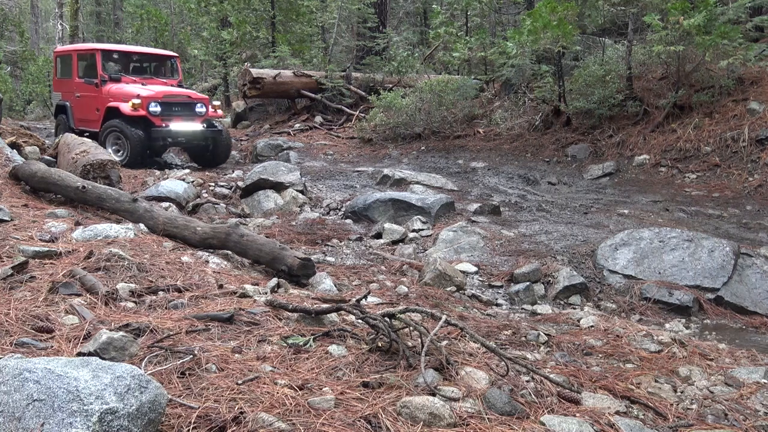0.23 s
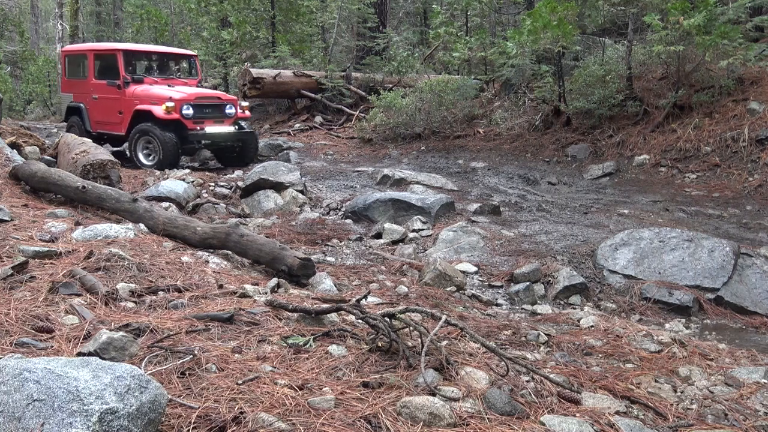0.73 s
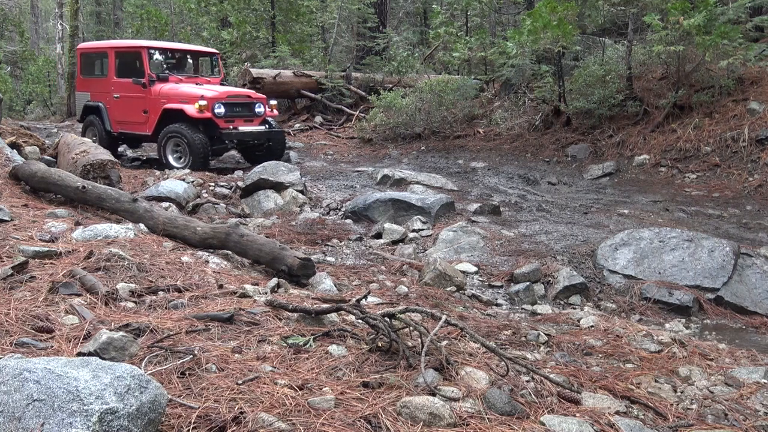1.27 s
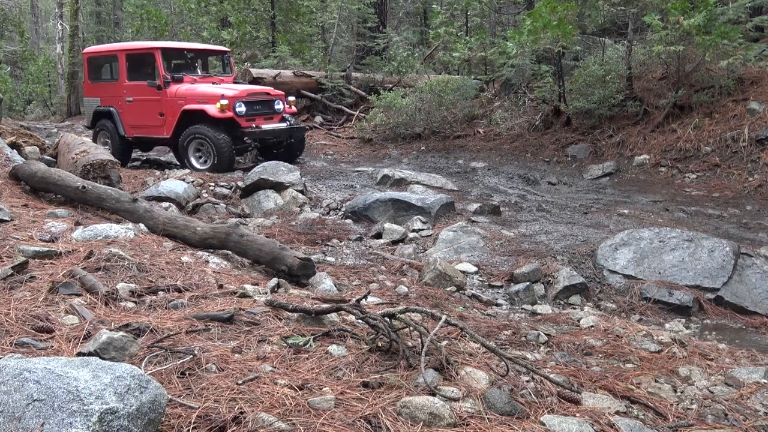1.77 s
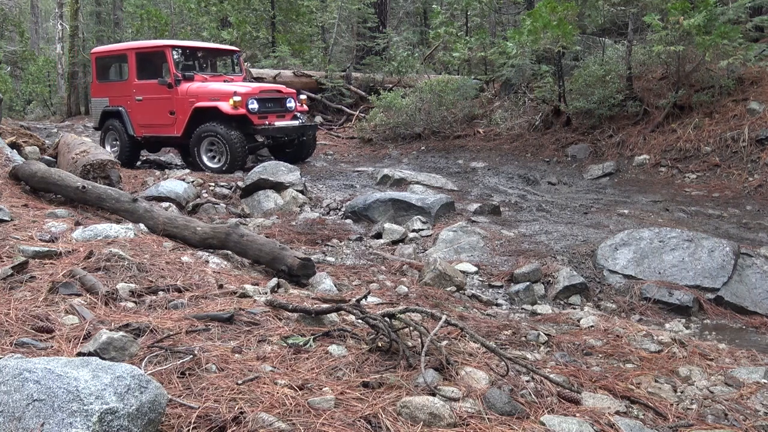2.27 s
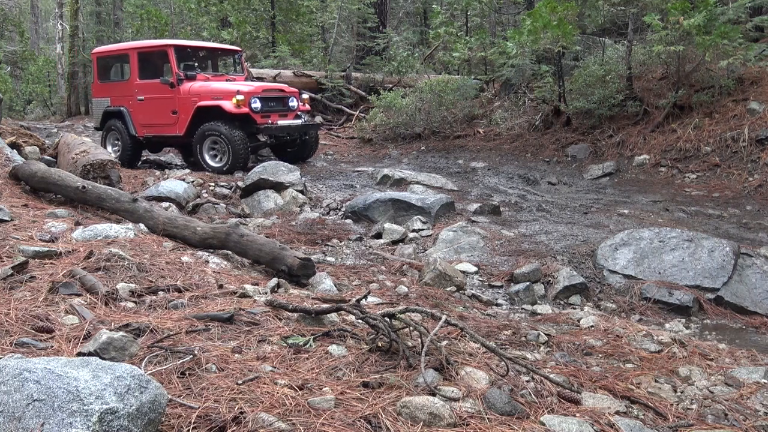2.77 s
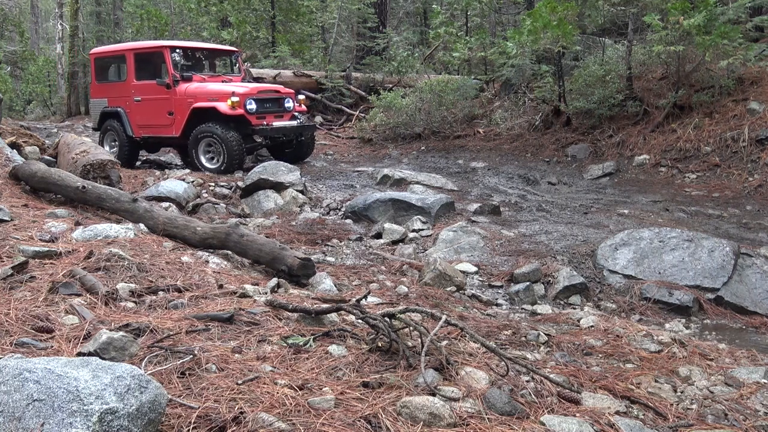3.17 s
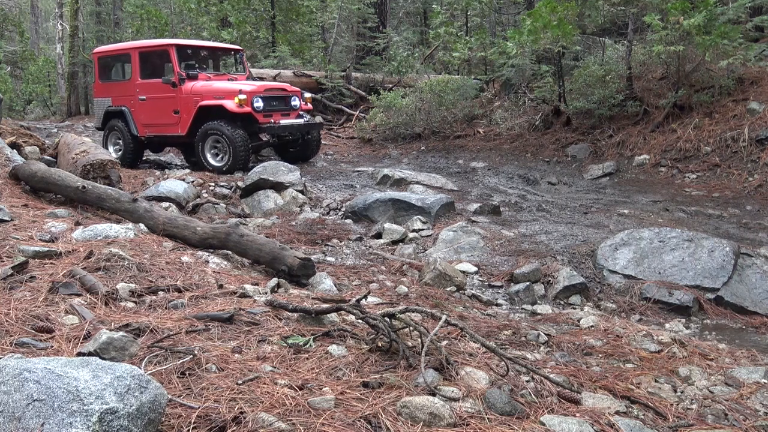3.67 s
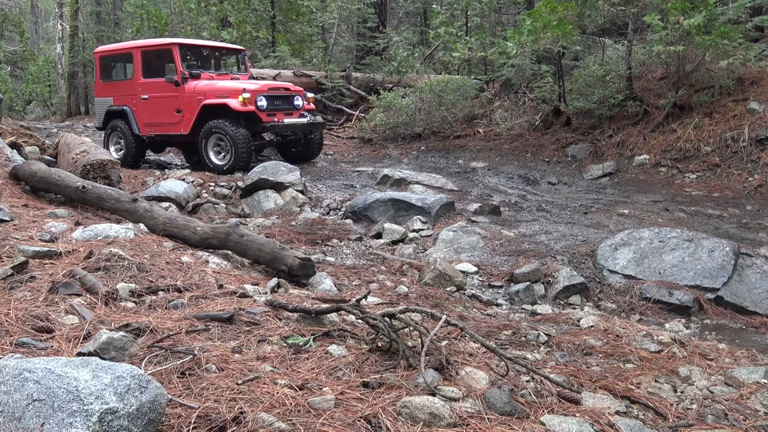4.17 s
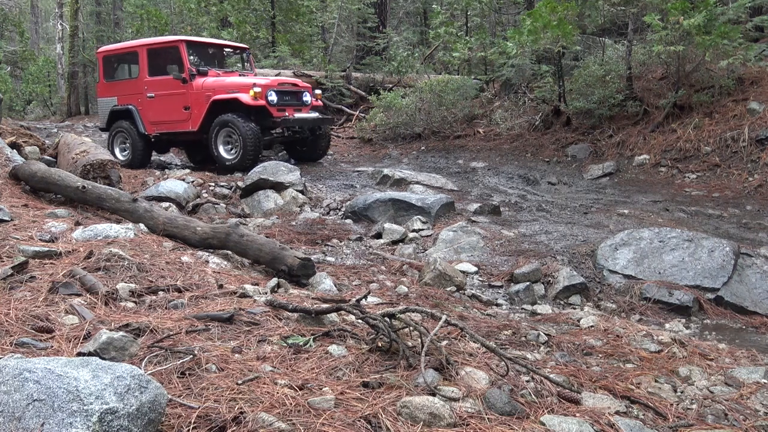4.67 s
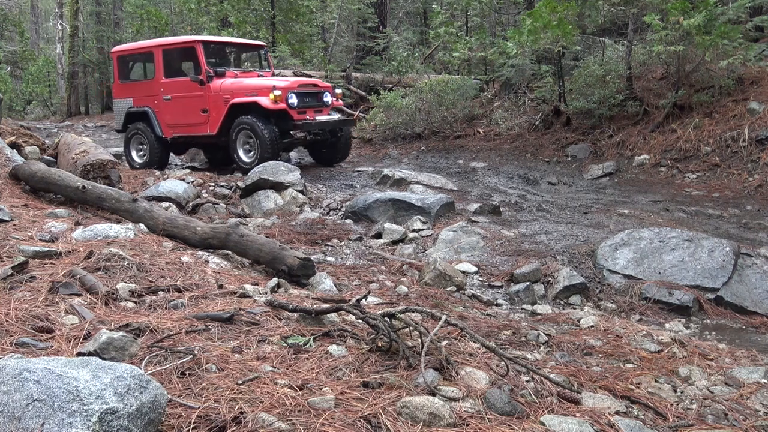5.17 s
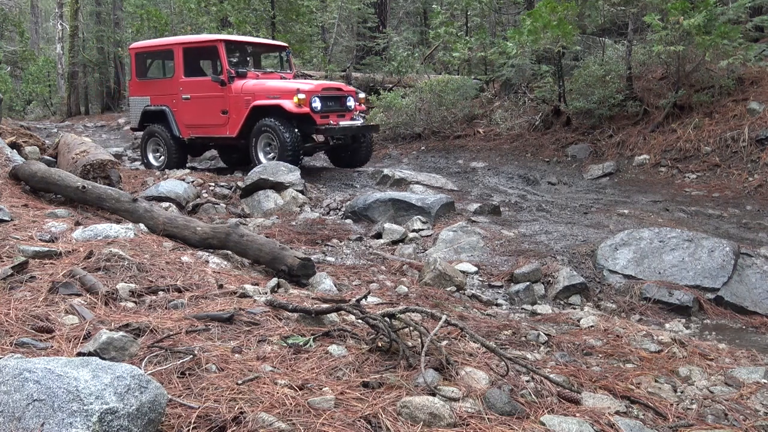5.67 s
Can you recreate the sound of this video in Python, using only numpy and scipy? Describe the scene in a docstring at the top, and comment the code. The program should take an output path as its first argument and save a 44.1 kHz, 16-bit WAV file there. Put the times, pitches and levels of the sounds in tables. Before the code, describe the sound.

Low uneven engine burble and whining fan, two throaty revs with crackling exhaust, tyre grit scraping on stones, then the engine sinks to a slow chug.

```python
"""A wet forest trail: some metres from the microphone, a V8 four-wheel-drive truck crawls over rocks.
Uneven firing pulses through a pipe make it lope near idle, while fan harmonics whine over coloured air noise.
It surges twice, the exhaust spitting bright noise bursts, and a tyre spins on the stones as scraping grit;
then the engine lugs down again. Bursts of band-passed grains knock, crunch, groan and squeak under the tyres.
The trees return a dull, scattered echo."""
import sys
import numpy as np
from scipy import signal
from scipy.fft import rfft, irfft, next_fast_len
from scipy.io import wavfile
from scipy.ndimage import uniform_filter1d

SR = 44100
rng = np.random.default_rng(int(sys.argv[2]) if len(sys.argv) > 2 else 0)


def file_out(sig):
    """Save sig as 16-bit WAV at sys.argv[1]."""
    # one column per channel
    cols = np.atleast_2d(sig).T
    # limit, then scale
    lim = np.clip(cols, -1, 1)
    pcm = np.round(lim * 32767).astype(np.int16)
    wavfile.write(sys.argv[1], SR, pcm)


N = 260631
TIME = np.arange(N) / SR   # s

# engine speed: (time [s], firing rate [firings/s])
ENGINE_SPEED = [(0, 76), (.3, 73), (.8, 56), (2.9, 51), (3.08, 66.6), (3.26, 92.6), (3.52, 56.3),
                (3.78, 54.8), (3.92, 91.5), (4.08, 110), (4.2, 123), (4.33, 121.5), (4.5, 115), (4.7, 97.6),
                (4.9, 90.7), (5.2, 62), (5.73, 36), (5.91, 48.5)]
# the eight cylinders in firing order: (strength [dB], lateness at the tailpipe [ms])
CYLINDERS = [(0, 2), (1.5, -0.92), (-1, 0.78), (3.5, -3), (-1.5, -0.07), (1, 2), (1.5, -2.5), (-2.5, 3.5)]
# response of pipe and muffler: (frequency [Hz], relative level [dB])
PIPE_RESPONSE = [(18, -44.5), (35, -16.5), (52, -7), (75, -5), (102, 3.5), (130, -1), (170, -11.5),
                 (228, -7.5), (265, -11.5), (325, -5), (430, -8), (520, -21.5), (800, -45.5), (6000, -80)]
# colour of the exhaust's spit and sizzle: (frequency [Hz], relative level [dB per Hz])
SPIT_COLOUR = [(2000, -38), (4000, -12), (6000, -14), (7300, -7), (8500, -4.5), (10000, -18.5),
               (13000, -18.5), (15500, -31)]


def from_db(db):
    """Decibels to amplitude."""
    return 10 ** (np.asarray(db) / 20)


def rms_one(x):
    """Scales a signal to an RMS of 1."""
    return x / np.sqrt(np.mean(x ** 2) + 1e-20)


def in_time(rows):
    """Each column of a curve at every sample."""
    seconds, *columns = np.transpose(rows)
    return [np.interp(TIME, seconds, column) for column in columns]


def levelled(x, seconds):
    """Takes out the slow level and keeps the beat."""
    power = uniform_filter1d(x ** 2, max(int(seconds * SR), 8))
    return x / np.sqrt(np.abs(power) + 1e-12)


def drift(rate):
    """Slow random wander of RMS 1, with `rate` knots per second."""
    knots = rng.standard_normal(2048)
    return rms_one(np.interp(TIME * rate, np.arange(len(knots)), knots))


def coloured(x, spectrum):
    """Causal (minimum-phase) filter with the given (frequency [Hz], level [dB]) response."""
    size = 2 * next_fast_len(N // 2 + 8192)
    hz, db = np.transpose(spectrum)
    bins_hz = np.maximum(np.arange(size // 2 + 1) * SR / size, 1)
    response_db = np.interp(np.log(bins_hz), np.log(hz), db)
    # folding the cepstrum onto positive times gives the minimum phase
    cepstrum = irfft(np.log(from_db(response_db)))
    cepstrum[1:size // 2] *= 2
    cepstrum[size // 2 + 1:] = 0
    return irfft(rfft(x, size) * np.exp(rfft(cepstrum)))[:N]


def passed(x, hz, kind, order=2):
    """Butterworth filter."""
    edges_hz = np.clip(hz, 10, .45 * SR)
    return signal.sosfilt(signal.butter(order, edges_hz, kind, fs=SR, output="sos"), x)


def decaying(pulses, decay_s):
    """Gives every pulse an exponential tail."""
    return signal.lfilter([1], [1, -np.exp(-1 / (decay_s * SR))], pulses)


def burst(start, rise, decay):
    """A quick linear rise and an exponential fall."""
    age = np.maximum(TIME - start, 0)
    fall = np.minimum(np.maximum(age - rise, 0) / decay, 20)
    return np.minimum(age / rise, 1) * np.exp(-fall)


def held(start, length, attack, release):
    """A linear rise, a hold until start + length, then an exponential fall."""
    rise = np.clip((TIME - start) / attack, 0, 1)
    return rise * np.exp(-np.maximum(TIME - start - length, 0) / release)


def grit(per_s, spread_db):
    """Dense tiny fractures of very unequal size."""
    sizes_db = spread_db * np.minimum(rng.exponential(1, N), 4)
    sizes = from_db(sizes_db) * rng.standard_normal(N)
    return rms_one(sizes * (rng.random(N) < per_s / SR))


def forest(x):
    """Dull scattered echoes from trunks and the bank, arriving at random and dying exponentially."""
    t60_s, first_echo_s = .45, .015
    age = TIME[:SR // 2]
    hits = (rng.random(len(age)) < .01) * (age > first_echo_s)
    echoes = rng.standard_normal(len(age)) * hits * from_db(-60 * age / t60_s)
    echoed = signal.fftconvolve(x, echoes / np.linalg.norm(echoes))[:N]
    return passed(echoed, 3700, "low")


def engine_bay(clatter, flutter_db):
    """Noise of air through the fan and radiator, throbbing faintly with the valve gear at the firing rate."""
    # fan, belts and valve gear: (time [s], level [dB])
    bay_level = [(0, -31.5), (1.0, -28.5), (1.4, -30.5), (1.8, -29), (2.4, -30.5), (5.91, -31)]
    # colour of the bay: (frequency [Hz], relative level [dB per Hz])
    bay_colour = [(150, -8), (320, 0.5), (540, -13), (800, -6), (1100, -6.5), (1750, -9), (2700, -15),
                  (4100, -17), (6000, -23.5), (8400, -22), (10000, -37), (13300, -36.5), (15000, -45)]
    fired = np.cumsum(in_time(ENGINE_SPEED)[0]) / SR
    throb = (1 + clatter * np.cos(2 * np.pi * fired)) * from_db(flutter_db * drift(25))
    air = rms_one(coloured(throb * rng.standard_normal(N), bay_colour))
    return from_db(in_time(bay_level)[0]) * air


def fan(wobble, flutter_db):
    """Harmonics of the blade rate, each fluttering on its own; some swell and fade."""
    # blade rate before wobble: (time [s], rate [Hz])
    blade_rate = [(0, 373.8), (1.2, 373.4), (2.3, 371.7), (3.6, 375.1), (5.1, 367), (5.91, 369.5)]
    # the whine before swells and flutter: (harmonic number, level [dB])
    harmonics = [(2, -48), (3, -46.5), (5, -50.5), (6, -44), (7, -47.5), (8, -52.5), (9, -54.5),
                 (10, -52.5), (11, -50.5), (12, -62)]
    # single harmonics swell as the truck turns: (harmonic number, middle [s], half length [s], rise [dB])
    whine_swells = [(2, 1.43, 0.49, 7), (5, 0.89, 0.29, 9.5), (5, 2.6, 1.7, 11), (5, 5.57, 0.7, 12.5),
                    (6, 0.95, 0.91, 11), (7, 1.18, 0.24, 7.5), (7, 1.888, 0.28, 6), (7, 2.9, 1.14, 6.5)]
    flatness = 4   # 2 is a bell, higher is flatter on top
    rate = in_time(blade_rate)[0] * (1 + wobble * drift(30.09))
    phase = 2 * np.pi * np.cumsum(rate) / SR
    whine = np.zeros(N)
    for order, db in harmonics:
        swell_db = np.zeros(N)
        for swelling, middle, half, rise_db in whine_swells:
            if swelling == order:
                swell_db += rise_db * np.exp(-np.abs((TIME - middle) / half) ** flatness)
        whine += from_db(db + swell_db + flutter_db * drift(14)) * np.sin(order * phase)
    return np.sqrt(2) * whine   # a sine of RMS 1 stands at 0 dB


def under_tyres(rise_s):
    """Sounds under the tyres: low knocks and thumps, bright crunches, a rubber groan and short squeaks."""
    # bursts under the tyres: (time [s], level [dB], centre [Hz], width [octaves], decay [s])
    tyre_sounds = [(0.179, -30.5, 7560, 0.47, 0.017), (.42, -33.5, 2000, 1, 0.14),
                   (.678, -31, 910, .9, 0.019), (.865, -25.5, 1390, 2.1, 0.076),
                   (0.882, -32, 4970, 1.4, 0.024), (1.365, -28, 517, 1.02, 0.024),
                   (1.455, -14.5, 89, 0.89, 0.0092), (2.075, -33, 2180, 1.13, 0.023),
                   (3.944, -25, 5150, 0.15, 0.0074), (4.585, -17.5, 930, 0.38, 0.045),
                   (4.6, -20.5, 1520, 0.44, 0.14), (4.68, -24, 2290, 1.7, 0.06),
                   (4.87, -25.5, 2000, 3.08, 0.029), (4.94, -32, 5600, 0.1, 0.015),
                   (5.35, -31, 1990, 1.08, 0.049), (5.384, -26.5, 1640, 0.8, 0.11),
                   (5.495, -31, 2386, 2, 0.058), (5.865, -31.5, 1502, 0.72, 0.037)]
    out = np.zeros(N)
    grains = grit(per_s=7600, spread_db=5.0)
    for start, db, hz, octaves, decay in tyre_sounds:
        half = 2 ** max(octaves / 2, .05)   # frequency ratio from centre to edge
        band = rms_one(passed(grains, [hz / half, hz * half], "band"))
        out += from_db(db) * burst(start, rise_s, decay) * band
    return out


def tyre_spin(judder_db):
    """A tyre breaks loose: tread blocks grab and scrape over wet grit, easing off until the tyre grips."""
    # colour of the scrape: (frequency [Hz], relative level [dB per Hz])
    scrape_colour = [(240, -7), (400, -12), (502, -6), (804, 2), (1090, -2.5), (1740, -3), (2790, -13.5),
                     (6040, -26), (8060, -29), (15000, -52)]
    start_s, start_db, sag_db_per_s = 4.5, -15, 20.5
    scrape = grit(per_s=14000, spread_db=2.0) * from_db(judder_db * drift(90))
    slip = held(start_s, length=0.43, attack=0.12, release=0.067)
    level_db = start_db - sag_db_per_s * np.maximum(TIME - start_s, 0)
    return from_db(level_db) * slip * rms_one(coloured(scrape, scrape_colour))


def load():
    """Strength of the firings in dB above idle; the strongest push on the pedal rules."""
    # pushes on the accelerator: (start [s], length [s], load above idle [dB])
    throttle = [(-0.2, 0.81, 6), (2.864, 0.2, 10), (3.007, 0.26, 17), (3.284, 0.13, 13.5), (3.5, 0.25, 8),
                (3.716, 1.057, 17.5), (4.883, 0.31, 9.5), (5.33, 0.35, 5), (5.83, 0.1, 8)]
    pushes = [db * held(start, length, attack=0.097, release=0.18) for start, length, db in throttle]
    return np.max(pushes, axis=0)


def exhaust_levels(speed):
    """Load drives the boom; with rising speed the energy moves up into the bark."""
    # exhaust without load: (firing rate [firings/s], boom level [dB], bark level [dB])
    voice = [(36, -28.5, -52.5), (51.4, -26, -35.5), (71.8, -25.5, -36), (90, -27.5, -26),
             (111, -31.5, -21), (120, -32.5, -21)]
    bark_follows_load = 0.37   # dB of bark per dB of load
    at_speed, boom_db, bark_db = np.transpose(voice)
    load_db = load()
    boom = np.interp(speed, at_speed, boom_db) + load_db
    bark = np.interp(speed, at_speed, bark_db) + bark_follows_load * load_db
    return boom, bark


def firings(speed, uneven_db, jitter, lope):
    """One pulse per firing; combustion is less even at low speed."""
    count = np.cumsum(speed) / SR
    number = np.arange(1, int(count[-1]))
    chance = rng.standard_normal((len(number), 2))
    at = np.interp(number, count, TIME)
    rate = np.interp(at, TIME, speed)
    level_db, late_ms = np.array(CYLINDERS)[number % len(CYLINDERS)].T
    unsteady = (speed.max() / rate) ** lope
    # jitter is a share of the firing interval
    at = at + late_ms / 1000 + jitter * unsteady * chance[:, 0] / rate
    pulses = np.zeros(N)
    places = np.clip(at * SR, 0, N - 1).astype(int)
    pulses[places] = from_db(level_db + uneven_db * unsteady * chance[:, 1])
    return pulses


def drone(speed, revving):
    """The part of the exhaust note that repeats exactly from cycle to cycle, coloured by the pipe."""
    # clean tones before the pipe: (multiple of the eight-firing cycle, lugging [dB], revving [dB]), relative
    tones = [(3, 3, -5), (5, 4.5, 11.5), (7, -4, -3), (8, 5, -3.5), (9, -30, 0), (10, -14.5, 1.5),
             (11, 0, -13), (12, -4, 0), (13, -7, 4.5), (15, -14, -4), (16, -4.5, 3), (20, -15, -0.5),
             (22, -15, -4.5), (24, -5.5, 2), (27, -18, 0)]
    cycles = np.cumsum(speed) / SR / len(CYLINDERS)
    pipe_hz, pipe_db = np.transpose(PIPE_RESPONSE)
    out = np.zeros(N)
    for order, lugging_db, revving_db in tones:
        tone_db = lugging_db + revving * (revving_db - lugging_db)
        tone_db = tone_db + np.interp(order * speed / len(CYLINDERS), pipe_hz, pipe_db)
        out += from_db(tone_db) * np.sin(2 * np.pi * (order * cycles + rng.random()))
    return levelled(out, 0.13)


def spits(level_db, rise_s, decay_s, small_db, spread_db):
    """Under load some firings end in a short bright spit of noise; a few are much louder."""
    # the loudest spits: (time [s], peak level relative to level_db [dB])
    loud_spits = [(3.16, -12.5), (3.2204, -15), (3.7979, -15), (3.8457, -8.5), (3.8871, -14), (3.911, -13),
                  (3.9463, -10.5), (4.0087, -13), (4.1445, -13), (4.2358, -14.5), (4.354, -20),
                  (4.561, -18)]
    spit_share, follows_load = .4, 1.3   # share of firings that spit; dB of spit per dB of load
    loud = sum(from_db(db + level_db) * burst(start, rise_s, decay_s) for start, db in loud_spits)
    fired = np.diff(np.floor(np.cumsum(in_time(ENGINE_SPEED)[0]) / SR), prepend=0) > 0
    spitting = fired * (rng.random(N) < spit_share)
    load_db = load()
    # small_db holds at the heaviest load
    sizes_db = small_db + follows_load * (load_db - load_db.max()) + spread_db * rng.uniform(-1.3, 1, N)
    small = decaying(spitting * from_db(sizes_db) + 1e-18, decay_s)
    return np.maximum(loud, small) * rms_one(coloured(rng.standard_normal(N), SPIT_COLOUR))


def exhaust(puff_s, rasp_db, sizzle_db, throb, boom_share):
    """Pulses boom and bark through the pipe; every puff also carries rushing gas."""
    # single beats against the clean note: (firing rate [firings/s], relative level [dB])
    beats = [(50, 0), (75, -6), (120, -11)]
    # firing rates between which the note changes from lugging to revving: (lower, upper) [firings/s]
    revving_range = (92, 114)
    # colour of the gas rush: (frequency [Hz], relative level [dB per Hz])
    rasp_colour = [(300, 7), (550, -2), (950, 2.5), (1400, -7.5), (2200, -10.5), (4000, -14), (8000, -18),
                   (15000, -34.5)]
    speed = in_time(ENGINE_SPEED)[0]
    boom_db, bark_db = exhaust_levels(speed)
    revving = np.interp(speed, revving_range, [0, 1])
    pulses = firings(speed, uneven_db=0.1, jitter=0.011, lope=0.69)
    puffs = levelled(decaying(pulses + 1e-9, puff_s), .2)
    flow = levelled(pulses, .3) + .18 * puffs * rng.standard_normal(N)

    # the faster the engine turns, the more the single beats merge into a clean note
    beat_db = np.interp(speed, *np.transpose(beats))
    single_beats = from_db(beat_db) * levelled(coloured(flow, PIPE_RESPONSE), .2)
    pipe = single_beats + drone(speed, revving)

    # when lugging, the bark swells once in every cycle of eight firings
    cycles = np.cumsum(speed) / SR / len(CYLINDERS)
    swell = 1 - throb * (1 - revving) * np.sin(2 * np.pi * cycles)
    boom = from_db(boom_db) * levelled(passed(pipe, 170, "low", order=4), .07)
    bark = from_db(bark_db) * swell * levelled(passed(pipe, 170, "high", order=4), .09)

    # the rush follows a level between bark and boom
    rush_db = rasp_db + bark_db + boom_share * (boom_db - bark_db)
    rush = from_db(rush_db) * rms_one(coloured((puffs + 4) * rng.standard_normal(N), rasp_colour))

    # a thin sizzle rides on the highest pressure crests only
    pressure = np.abs(boom + bark)
    crests = (pressure / pressure.max()) ** 2
    sizzle = from_db(sizzle_db) * rms_one(coloured(crests * rng.standard_normal(N), SPIT_COLOUR))
    return boom + bark + rush + sizzle


def scene():
    """The truck with its echo from the trees, and the fan's whine heard without echo."""
    engine = exhaust(puff_s=0.021, rasp_db=-6, sizzle_db=-43.0, throb=0.4, boom_share=0.48)
    engine = engine + spits(level_db=-8.5, rise_s=0.0017, decay_s=0.0056, small_db=-34.5, spread_db=10)
    ground = tyre_spin(judder_db=2.5) + under_tyres(rise_s=0.0053)
    truck = engine + ground + engine_bay(clatter=0.077, flutter_db=.5)
    whine = fan(wobble=0.00084, flutter_db=1.23)
    tree_echo_db = -19
    return (truck + from_db(tree_echo_db) * forest(truck) + whine)[None]


def record(dry):
    """At the microphone the highest peaks are rounded and the top is cut."""
    cutoff_hz = 15900
    rounded = dry / (1 + np.abs(dry) ** 8) ** (1 / 8)
    return signal.sosfilt(signal.ellip(10, .1, 80, cutoff_hz, fs=SR, output="sos"), rounded)


dry = scene()
out = record(dry)
file_out(out)
```